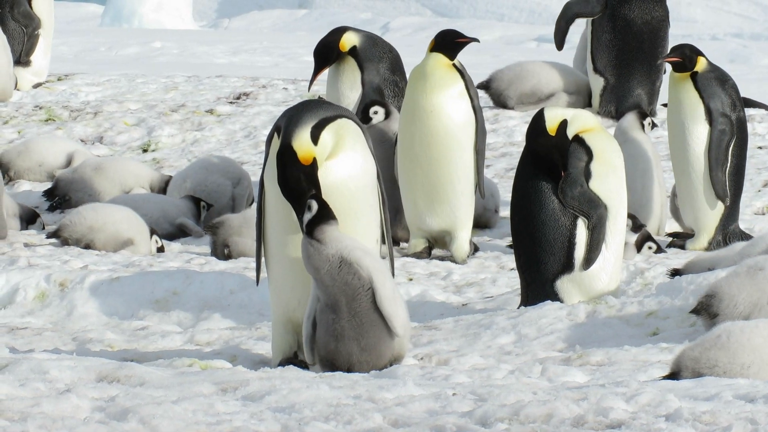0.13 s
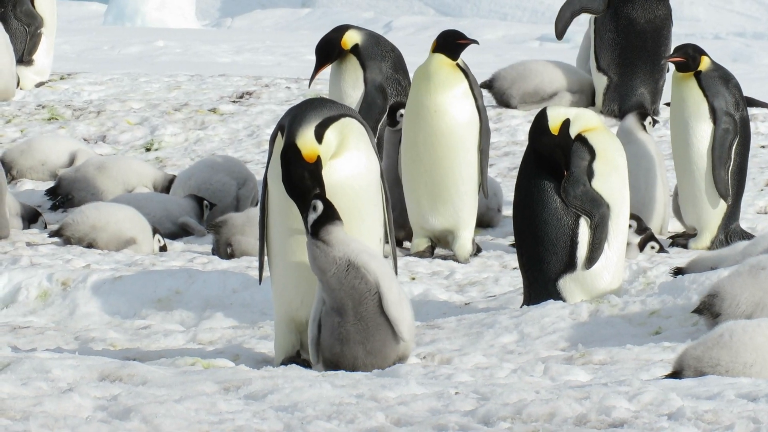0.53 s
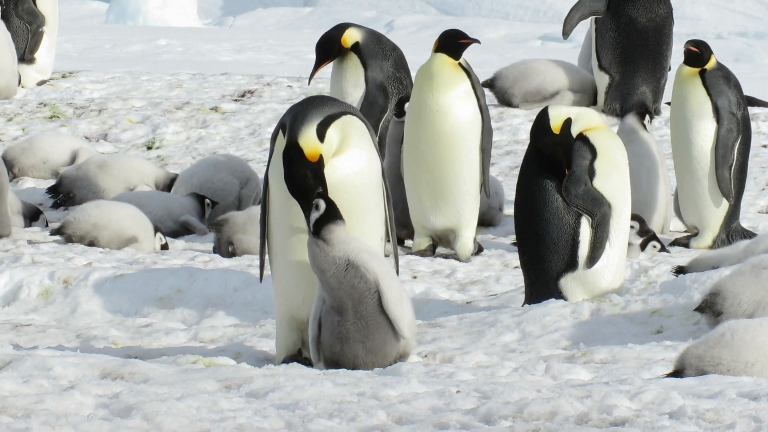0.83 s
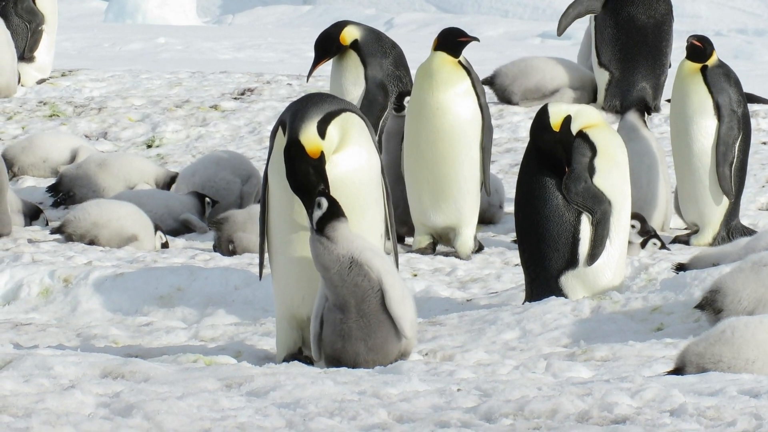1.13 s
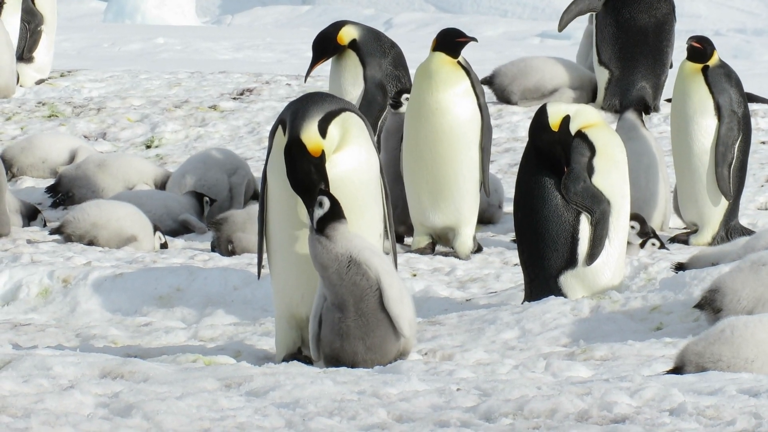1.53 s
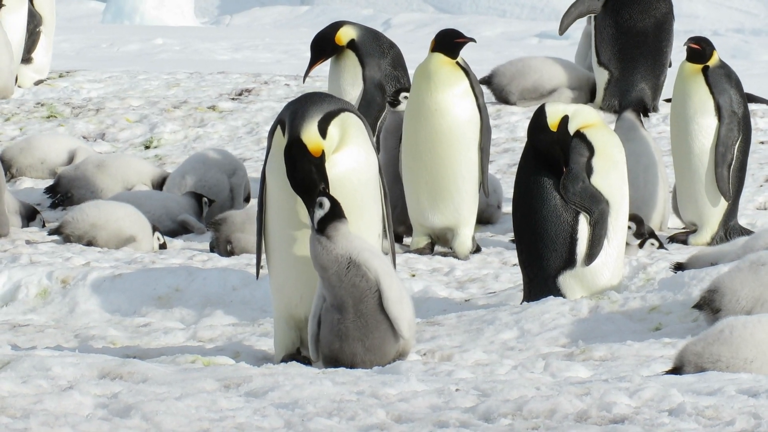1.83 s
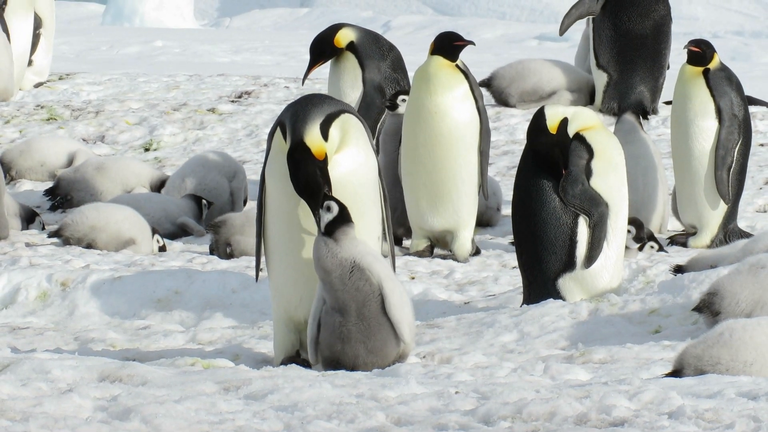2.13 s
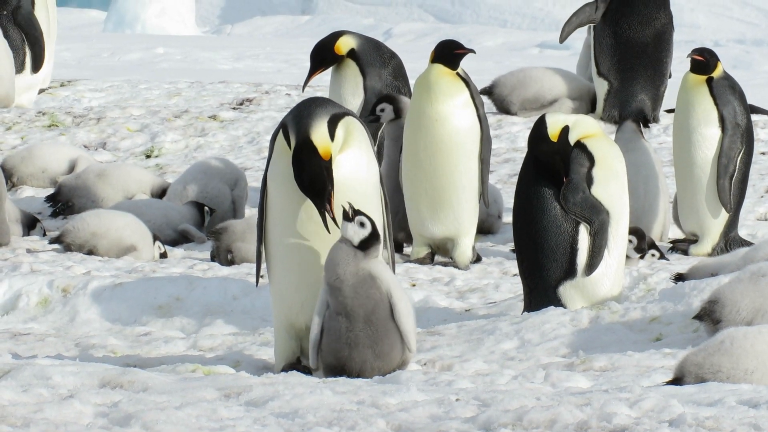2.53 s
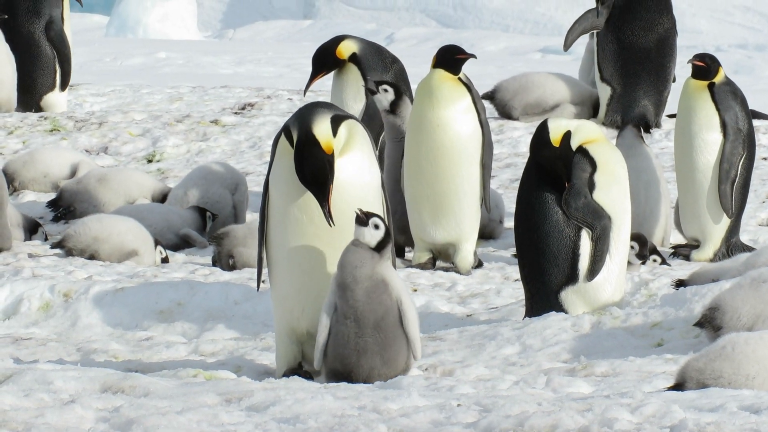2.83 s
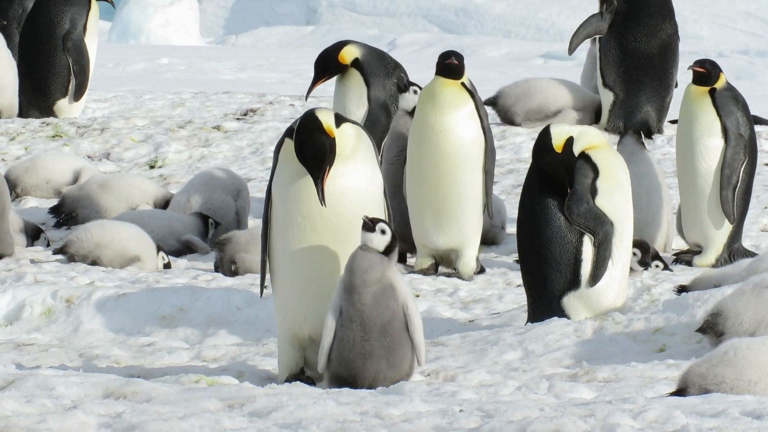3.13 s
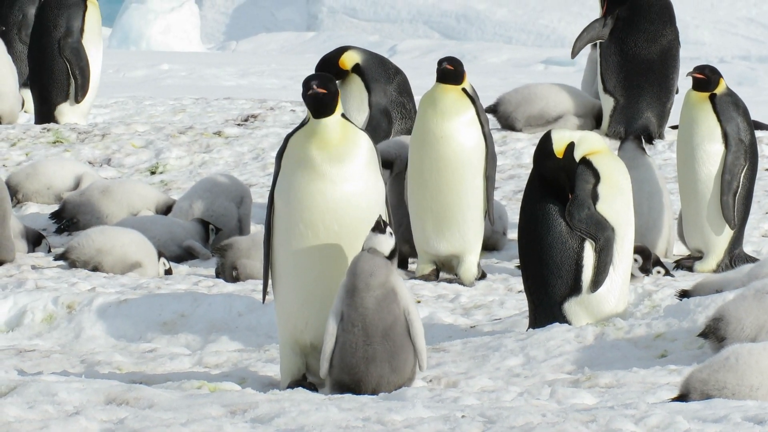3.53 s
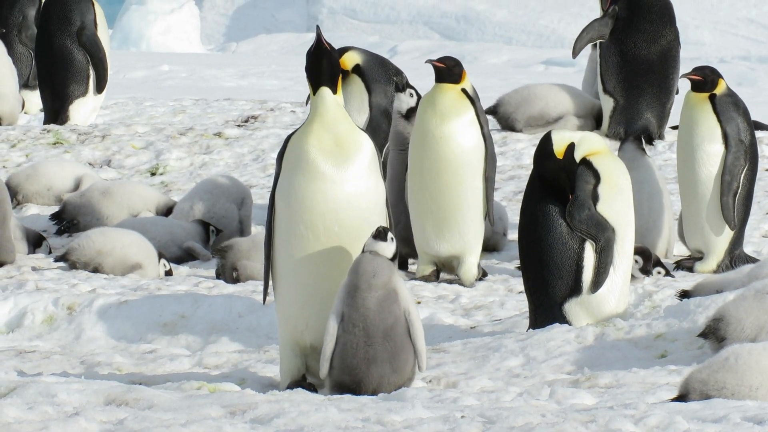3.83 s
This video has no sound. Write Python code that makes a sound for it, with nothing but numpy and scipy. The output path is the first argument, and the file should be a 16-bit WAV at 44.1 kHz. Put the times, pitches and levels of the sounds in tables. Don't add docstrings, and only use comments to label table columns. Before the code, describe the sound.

Penguin chicks give clear warbling whistles falling in pitch over a busy chirping colony

```python
import sys
import numpy as np
from scipy import signal
from scipy.fft import rfft, irfft
from scipy.io import wavfile
from scipy.ndimage import map_coordinates

SR = 44100
rng = np.random.default_rng(int(sys.argv[2]) if len(sys.argv) > 2 else 0)


def to_linear_factor(level_db):
    exponent = np.asarray(level_db, float) / 20
    return 10 ** exponent


def digitize_waveform(pressure):
    field = np.atleast_2d(pressure).T
    bounded = np.clip(field, -1, 1)
    quanta = np.round(bounded * 32767).astype(np.int16)
    wavfile.write(sys.argv[1], SR, quanta)


N = 176400

# (frequency [Hz], level [dB])
THROAT = [(950, -23), (1250, -6.5), (1750, 0.5), (2000, -0.5), (2800, -7), (3700, -1.5), (6000, -13),
          (12000, -21.5)]
OVERTONE_DB = -8
ATTACK_S, SOFT_ATTACK_S, RELEASE_S = 0.003, 0.006, 0.009
RASP_S, RASP_NEAR_DB = 0.007, -20
FAR_DULL_DB = -1.9
BREAK_HZ = 2050


def along(points, hz):
    f, v = np.transpose(points)
    return np.interp(np.log(hz + 1), np.log(f + 1), v)


def wobble(rate_hz, size=N):
    knots = rng.standard_normal(int(size * rate_hz / SR) + 4)
    return map_coordinates(knots, [1 + np.arange(size) * rate_hz / SR])


def smooth(s, v, t):
    step = np.diff(v) / np.diff(s)
    a, b = step[:-1], step[1:]
    inner = np.where(a * b > 0, 2 * a * b / (a + b + 1e-9), 0)
    if len(inner):
        ends = (2 * step[0] - inner[0], 2 * step[-1] - inner[-1])
    else:
        ends = (step[0], step[0])
    slope = np.r_[ends[0], inner, ends[1]]
    k = np.clip(np.searchsorted(s, t) - 1, 0, len(s) - 2)
    h = np.diff(s)[k]
    u = (t - s[k]) / h
    base = v[k] + (v[k + 1] - v[k]) * u * u * (3 - 2 * u)
    return base + h * u * (1 - u) * (slope[k] * (1 - u) - slope[k + 1] * u)


def span(s):
    return np.arange(max(s[0] - ATTACK_S, 0), s[-1] + RELEASE_S / 2, 1 / SR)


def add_whistle(out, t, hz, effort_db, rough=1, tilt_db=OVERTONE_DB, rasp_db=0,
                dull_db=FAR_DULL_DB, attack_s=ATTACK_S):
    jitter, flutter_db = 0.011, 1.8
    onset_rasp_db, breath_db = -9, -21
    glide_loss_db, glide_rasp = -0.07, 0.006

    unsteady_hz = hz * (1 + rough * jitter * wobble(250, size=len(t)))
    phase = 2 * np.pi * (np.cumsum(unsteady_hz) / SR + rng.random())
    order = np.arange(1, 15)[:, None]
    waver = np.array([wobble(90, size=len(t)) for _ in order])
    glide = np.abs(np.gradient(np.log2(hz))) * SR

    level_db = tilt_db * np.log2(order) + along(THROAT, order * hz)
    level_db = level_db + rough * flutter_db * np.sqrt(order) * waver
    level_db = level_db + glide_loss_db * min(rough, 1) * glide * order
    level_db = level_db + dull_db * (order - 1) * hz / 1e3
    tone = to_linear_factor(level_db) * np.sin(order * phase) * (order * hz < SR / 2.5)

    since, until = t - t[0], t[-1] - t
    ramp = np.clip(np.minimum(since / attack_s, until / RELEASE_S), 0, 1)
    edge = np.sin(ramp * np.pi / 2) ** 2
    rasp = to_linear_factor(onset_rasp_db) * (np.exp(-since / RASP_S) + 0.5 * np.exp(-until / RASP_S))
    rasp = rasp + to_linear_factor(breath_db) + glide_rasp * glide * edge
    note = np.array([edge * tone.sum(0), rasp * to_linear_factor(rasp_db)])
    out[:, round(t[0] * SR):][:, :len(t)] += to_linear_factor(effort_db) * note


def voiced(out):
    hz = np.fft.rfftfreq(N, 1 / SR)
    grain = out[1, :N] * rng.standard_normal(N) * to_linear_factor(3 * wobble(400))
    colour_db = along(THROAT, hz) - 6.5 * np.log2(1 + hz / BREAK_HZ)
    return out[0, :N] + irfft(rfft(grain) * to_linear_factor(colour_db), N)


def wind():
    # (frequency [Hz], density [dB per Hz])
    spectrum = [(22, -39.5), (60, -5.5), (200, -11), (620, -17.5), (830, -14), (1600, -10), (5000, -35),
                (15000, -41)]
    # (time [s], level [dB])
    bumps = [
        (1.17, 7),
        (1.47, 3),
        (1.88, 7),
        (2.1, 4),
        (3.27, 13.5),
    ]
    wind_db, gust_db, bump_s = -65, 1.5, 0.035

    hz = np.fft.rfftfreq(N, 1 / SR)
    t = np.arange(N) / SR
    colour = rfft(rng.standard_normal(N)) * to_linear_factor(along(spectrum, hz))
    low = 1 / (1 + (hz / 130) ** 4)
    gain = to_linear_factor(wind_db) / np.std(irfft(colour, N))
    bump_db = sum(db * np.exp(-((t - s) / bump_s) ** 2) for s, db in bumps)
    lumps = to_linear_factor(gust_db * wobble(1.4) + bump_db)
    return gain * (irfft(colour * low, N) * lumps + irfft(colour * (1 - low), N))


def adult():
    # (start [s], length [s], level [dB], pitch [Hz])
    phrases = [
        (1.601, 0.26, -75.5, 465),
        (1.855, 0.94, -73.5, 477),
        (3.306, 0.89, -71.5, 476.4),
        (3.714, 0.3, -66.5, 412.6),
        (3.72, 0.27, -75, 335),
    ]
    syllable_rate_hz, upper_db = 11.4, -5

    out, t = np.zeros(N), np.arange(N) / SR
    for s, length_s, db, hz in phrases:
        phase = 2 * np.pi * np.cumsum(hz * (1 + 0.0342 * wobble(37))) / SR
        gate = np.clip(np.minimum(t - s, s + length_s - t) / 0.005, 0, 1)
        if length_s > 0.3:
            gate = gate * np.sin(np.pi * syllable_rate_hz * (t - s)) ** 2
        tone = np.sin(phase) + to_linear_factor(upper_db) * np.sin(2 * phase)
        out += to_linear_factor(db + 4.3 * wobble(20)) * gate * tone
    return out


def crowd(count=170):
    # (time [s], level [dB])
    busy = [(0, 14), (1.1, 0.5), (1.85, 6.5), (2.1, 0), (2.9, 10), (3.3, -3.5), (4, 10)]
    crowd_db, spread_db = -63.5, 3
    pitch_hz, swing_oct, warble_hz, scrap_s = 1800, 0.21, 15, 0.05

    out = np.zeros((2, N + SR))
    for when, length, turn, size, high in rng.random((count, 5)):
        start_s = when * N / SR
        t = np.arange(int(scrap_s * (0.5 + 0.86 * length) * SR)) / SR
        swing = swing_oct * np.cos(2 * np.pi * (warble_hz * t * (1.4 - length) + turn * 0.65))
        hz = pitch_hz * 2 ** (swing + 0.5 * (high - 0.5) - t)
        db = crowd_db + spread_db * size ** 2 + np.interp(start_s, *np.transpose(busy))
        add_whistle(out, t + start_s, hz, db, rasp_db=RASP_NEAR_DB / 2, attack_s=2 * SOFT_ATTACK_S)
    return voiced(out)


def add_other_chicks(out):
    # (level [dB], turns [(time [s], pitch [Hz])])
    mid_notes = [(-43, [(0.098, 2380), (0.14, 1380), (0.158, 1418), (0.18, 1320)]), (-37, [(0.18, 1868),
                 (0.207, 2300), (0.24, 1600), (0.29, 1240)]), (-40.5, [(0.105, 2310), (0.15, 2063),
                 (0.19, 2520)]), (-36, [(0.225, 2690), (0.235, 2245), (0.25, 2730)]), (-45.5, [(0.26, 2790),
                 (0.292, 2020), (0.31, 2580)]), (-41, [(0.29, 1630), (0.32, 1694), (0.352, 1794)]),
                 (-41, [(0.345, 2615), (0.365, 1540), (0.39, 2520)]), (-39, [(0.375, 2146), (0.39, 1925),
                 (0.413, 2110)]), (-36.5, [(0.47, 2574), (0.495, 1495), (0.52, 2300)]), (-41, [(.571, 2750),
                 (.59, 1750)]), (-42.5, [(0.62, 1445), (0.65, 1748), (0.675, 1410)]),
                 (-45, [(0.83, 2007), (0.845, 1661), (0.87, 1425), (0.905, 1650)]),
        (-44.5, [(0.922, 2690), (0.94, 1727), (0.98, 1450)]),
        (-46, [(0.955, 1182), (0.97, 1220), (0.998, 1810)]),
        (-52, [(1.0, 1596), (1.05, 1343), (1.095, 1152)]),
        (-46.5, [(1.1, 1384), (1.16, 1800), (1.19, 1407), (1.213, 1860)]),
        (-44.5, [(1.21, 1653), (1.25, 1460), (1.29, 1294), (1.33, 1430)]),
        (-44.5, [(1.23, 2000), (1.275, 2136), (1.3, 3060)]),
        (-42, [(1.287, 1366), (1.3, 1700), (1.335, 1615), (1.365, 1840)]),
        (-41.5, [(1.467, 2620), (1.5, 2030), (1.52, 2470)]),
                 (-52.5, [(1.84, 2083), (1.87, 1508), (1.9, 1802)]),
        (-56.5, [(1.92, 1740), (2.03, 1567)]),
        (-46, [(2.08, 1165), (2.115, 1727)]),
        (-45, [(2.24, 1800), (2.29, 1366), (2.36, 1387), (2.405, 1044)]),
        (-45, [(2.85, 1544), (2.877, 1957)]),
        (-44, [(2.915, 2205), (2.93, 1700), (2.96, 1425), (2.99, 1360)]),
        (-39.5, [(2.97, 1410), (2.99, 2130)]),
        (-47.5, [(3.005, 2410), (3.02, 1860), (3.07, 1460)]),
        (-40.5, [(3.025, 1828), (3.052, 1150), (3.095, 1983)]),
                 (-41, [(3.078, 1505), (3.1, 1520), (3.15, 1415), (3.215, 1734)]),
        (-38.5, [(3.115, 1438), (3.15, 923), (3.2, 1454)]),
        (-51.5, [(3.555, 1716), (3.57, 1680), (3.59, 2520)]),
        (-50, [(3.645, 1577), (3.67, 1306), (3.7, 1800)]),
        (-44.5, [(3.7, 1800), (3.71, 1723), (3.73, 2640)]),
        (-47.5, [(3.78, 2735), (3.795, 1800), (3.85, 1537), (3.9, 1760)]),
        (-37.5, [(3.815, 2235), (3.828, 2000), (3.848, 2410)]),
        (-37, [(3.893, 2650), (3.915, 1440), (3.93, 1613), (3.955, 2250)]),
        (-36, [(3.982, 2350), (3.999, 1410)]),
    ]
    # (level [dB], turns [(time [s], pitch [Hz])])
    faint_notes = [(-48.5, [(.008, 1900), (.03, 1200)]), (-47, [(.035, 2100), (.048, 2500), (.068, 1600)]),
                   (-67, [(.045, 1200), (.06, 2000)]), (-45.5, [(.074, 2100), (.092, 2600)]),
                   (-49, [(.415, 2100), (.43, 2650), (.45, 1900)]), (-55.5, [(.7, 1500), (.745, 1850),
                   (.82, 1300)]), (-61, [(.77, 2900), (.782, 1900), (.83, 2250)]), (-48.5, [(.85, 2000),
                   (.864, 2550), (.882, 2050)]), (-49, [(.838, 1800), (.857, 1570), (.872, 1800)]),
                   (-44, [(.997, 1750), (1.035, 1350)]), (-44, [(1.362, 2900), (1.39, 2100), (1.405, 2200),
                   (1.417, 2900)]), (-47, [(1.36, 1350), (1.385, 1450), (1.42, 1300)]), (-49.5, [(1.43, 2800),
                   (1.452, 1850), (1.465, 1700)]), (-38, [(1.548, 2500), (1.565, 1700), (1.59, 1520)]),
                   (-45, [(1.62, 1700), (1.64, 1750), (1.652, 1400)]),
                   (-54, [(1.715, 2290), (1.745, 1515), (1.835, 2147), (1.89, 1650), (1.92, 1750)]),
               (-56.5, [(1.785, 1890), (1.802, 2450), (1.815, 2100)]), (-48.5, [(1.855, 2250),
               (1.863, 2580), (1.872, 2200)]), (-54.5, [(1.905, 2102), (1.94, 1310), (2.02, 1170)]),
               (-52.5, [(2.14, 1680), (2.165, 1704), (2.182, 2300)]), (-54, [(2.54, 1934), (2.565, 2410),
               (2.62, 1400)]), (-57.5, [(2.64, 1570), (2.685, 2026), (2.76, 1296), (2.84, 1685)]),
               (-58, [(2.65, 1385), (2.68, 1600), (2.71, 1350)]), (-55.5, [(2.748, 2360), (2.78, 1655),
               (2.81, 1900)]), (-47.5, [(2.93, 1800), (2.945, 1790), (2.96, 2250)]), (-52, [(3.19, 1466),
               (3.225, 1036)]), (-56.5, [(3.385, 2376), (3.41, 1554), (3.43, 2170)]), (-60, [(3.468, 2305),
               (3.5, 1450), (3.55, 1800)]), (-65, [(3.595, 1940), (3.65, 1510)]), (-50, [(3.66, 1660),
               (3.69, 2210)]), (-58.5, [(3.735, 2260), (3.775, 1660)])]
    # (level [dB], turns [(time [s], pitch [Hz])])
    away = [
        (-41, [(3.272, 1668), (3.32, 1320), (3.355, 1026)]),
    ]
    away_overtone_db, sag_db = -24, -3

    facing = mid_notes + faint_notes
    for notes, tilt_db in ((facing, OVERTONE_DB), (away, away_overtone_db)):
        for db, turns in notes:
            s, hz = np.transpose(turns)
            t = span(s)
            effort_db = db + sag_db * np.linspace(-0.5, 0.5, len(t))
            add_whistle(out, t, np.exp(smooth(s, np.log(hz), t)), effort_db, rough=0.9, tilt_db=tilt_db,
                        rasp_db=tilt_db - OVERTONE_DB, attack_s=SOFT_ATTACK_S)


def add_breaks(out):
    # (start [s], length [s], level [dB])
    breaks = [
        (.142, .036, -51),
        (1.186, .035, -44),
    ]
    # (time [s], level [dB])
    cracks = [
        (1.005, -46),
        (1.162, -45),
        (2.115, -54),
        (2.281, -43),
        (3.705, -49),
    ]
    drop_oct = 1.3

    for s, length_s, db in breaks:
        t = span([s, s + length_s])
        hz = BREAK_HZ * 2 ** (-drop_oct * np.sin(np.pi * (t - s) / length_s) ** 2)
        add_whistle(out, t, hz, db, rough=2.5, tilt_db=-11, rasp_db=12, dull_db=0.3)
    for s, db in cracks:
        out[1, :N] += to_linear_factor(db) * np.exp(-(2 * (np.arange(N) / SR - s) / RASP_S) ** 2)


def add_near_chicks(out):
    # (time [s], pitch [Hz], level [dB])
    calls = [
        [(0.125, 2027, -46), (0.148, 1895, -35)],
        [(0.172, 2020, -30.5), (0.212, 1593, -36.5), (0.247, 1858, -32.5), (0.3, 1315, -44), (0.36, 895, -53.5)],
        [(0.45, 1800, -33.5), (0.507, 1234, -45.5), (0.577, 1753, -32.5), (0.65, 1197, -45.5),
         (0.685, 1269, -46), (0.73, 906, -60.5)],
        [(1.163, 2040, -31.5), (1.175, 2094, -33), (1.192, 2010, -35)],
        [(1.215, 2135, -44), (1.222, 2032, -30), (1.263, 1720, -36.5), (1.295, 1997, -29.5),
         (1.36, 1329, -42.5), (1.43, 926, -62.5)],
        [(1.468, 1733, -45), (1.485, 1690, -38.5), (1.522, 1234, -44.5), (1.575, 1710, -37.5),
         (1.605, 1714, -34.5), (1.665, 1233, -43), (1.695, 1280, -47), (1.75, 906, -59.5)],
        [(2.283, 2445, -34.5), (2.298, 2102, -24.5), (2.328, 2390, -29), (2.348, 1970, -25.5),
         (2.38, 1608, -36.5), (2.42, 1965, -28), (2.46, 1594, -37), (2.505, 1074, -52.5), (2.55, 950, -63)],
    ]
    for s, hz, db in (np.transpose(call) for call in calls):
        t = span(s)
        effort_db = smooth(s, db - along(THROAT, hz), t)
        add_whistle(out, t, np.exp(smooth(s, np.log(hz), t)), effort_db, rough=0.3,
                    rasp_db=RASP_NEAR_DB, dull_db=-2.5)


def chicks():
    out = np.zeros((2, N + SR))
    add_other_chicks(out)
    add_breaks(out)
    add_near_chicks(out)
    return voiced(out)


def ground(x):
    t60_s = 0.15
    t = np.arange(SR // 4) / SR
    tail = rng.standard_normal(len(t)) * to_linear_factor(-60 * t / t60_s)
    return signal.fftconvolve(x, tail / np.linalg.norm(tail))[:N]


def scene():
    echo_db = -21
    voices = chicks() + crowd()
    return (voices + to_linear_factor(echo_db) * ground(voices) + adult() + wind())[None]


def low_pass(x):
    return signal.sosfilt(signal.butter(12, 15610, fs=SR, output="sos"), x)


def record(dry):
    return low_pass(dry)


dry = scene()
out = record(dry)
digitize_waveform(out)
```